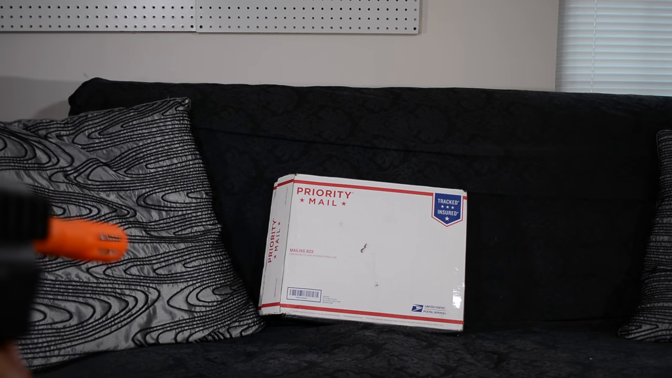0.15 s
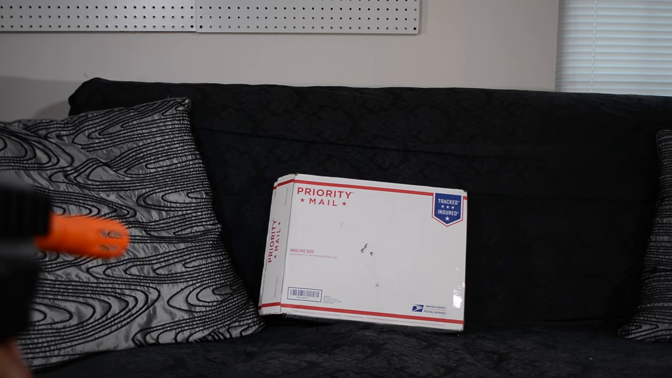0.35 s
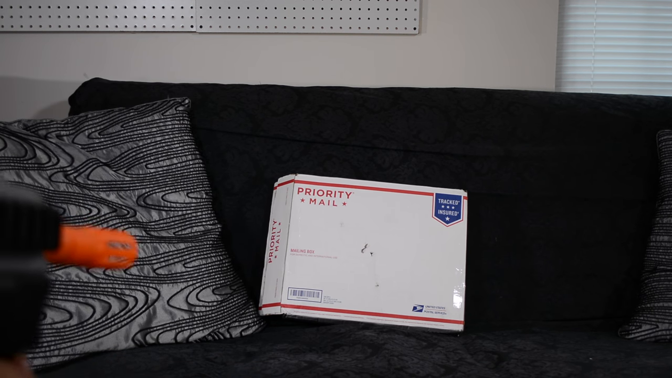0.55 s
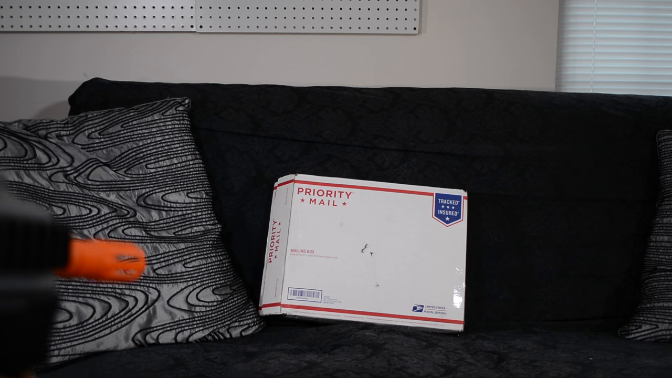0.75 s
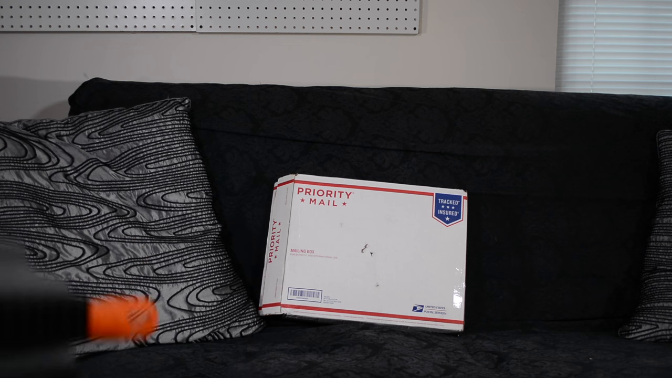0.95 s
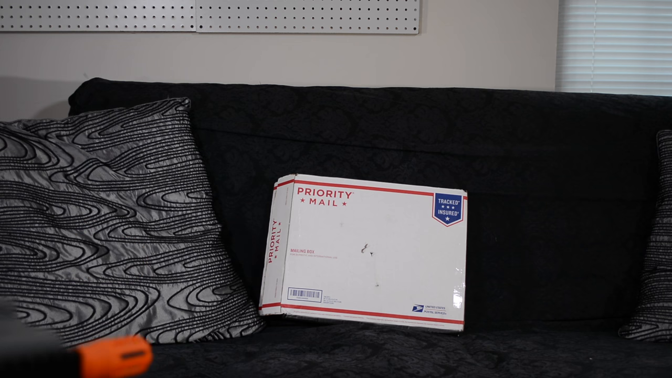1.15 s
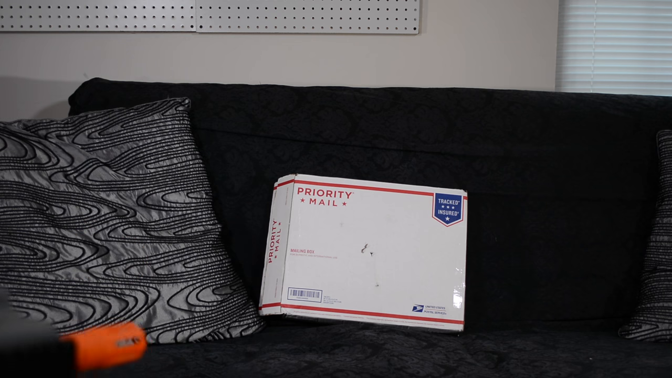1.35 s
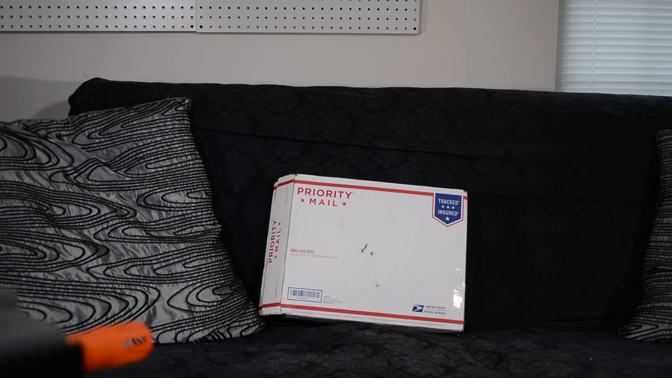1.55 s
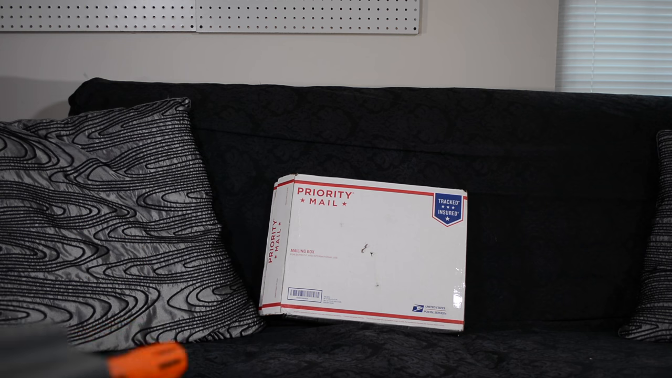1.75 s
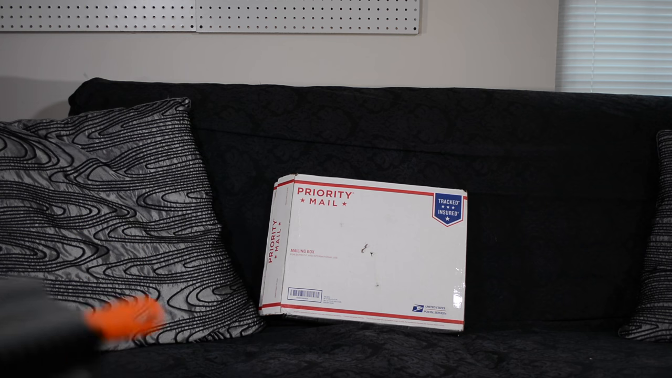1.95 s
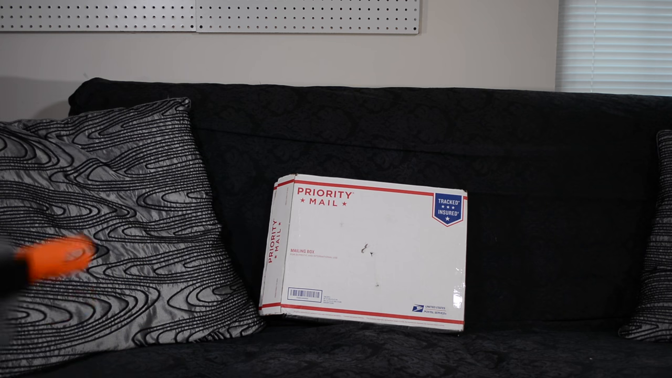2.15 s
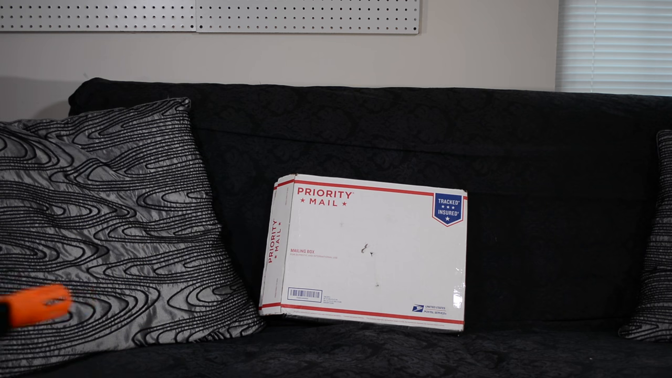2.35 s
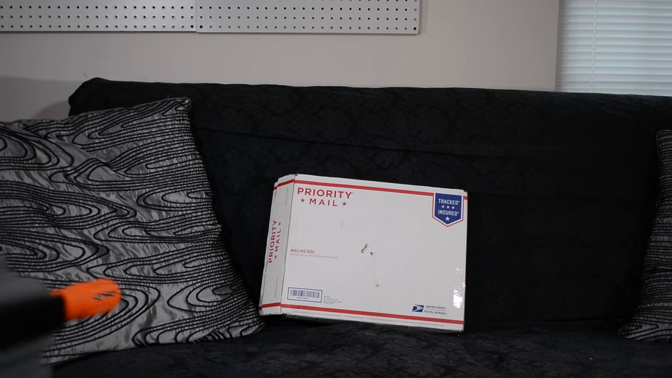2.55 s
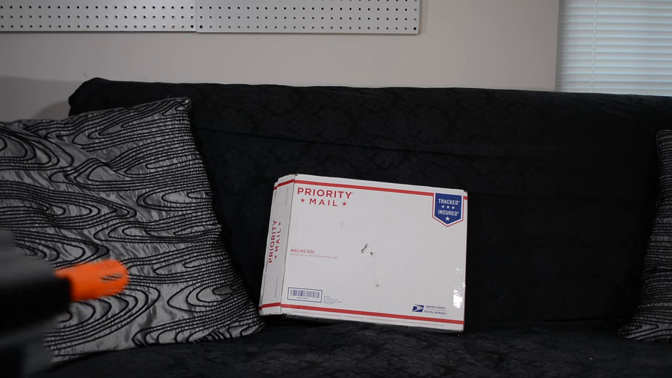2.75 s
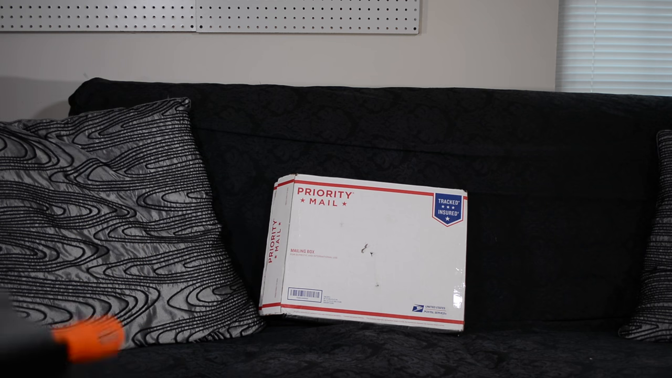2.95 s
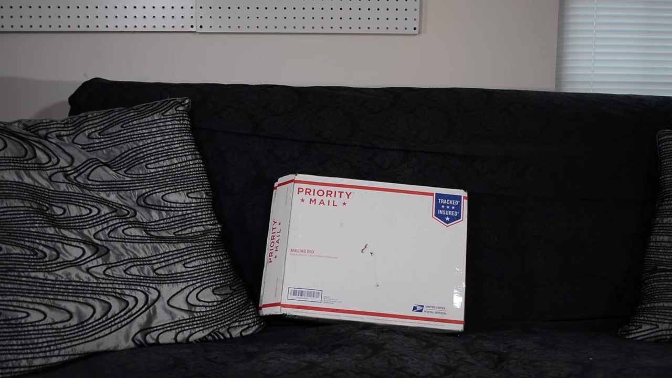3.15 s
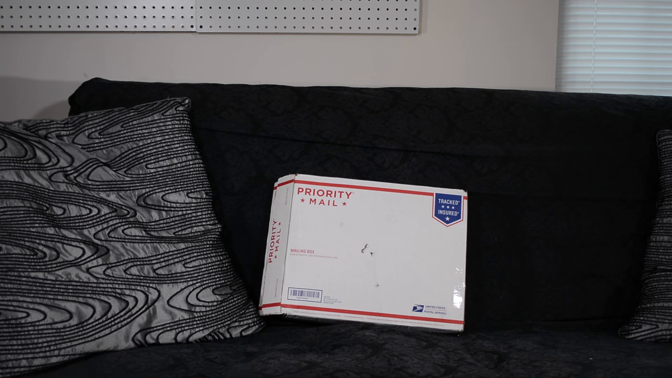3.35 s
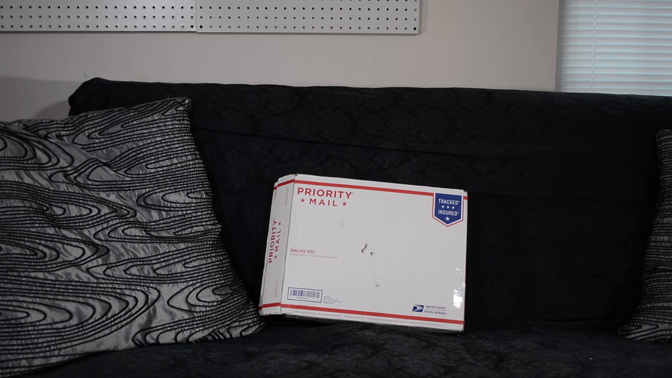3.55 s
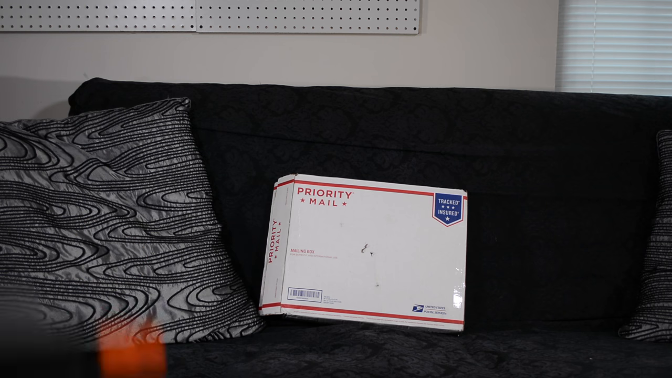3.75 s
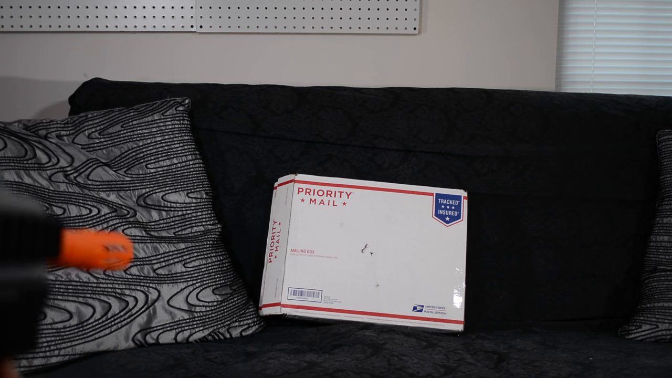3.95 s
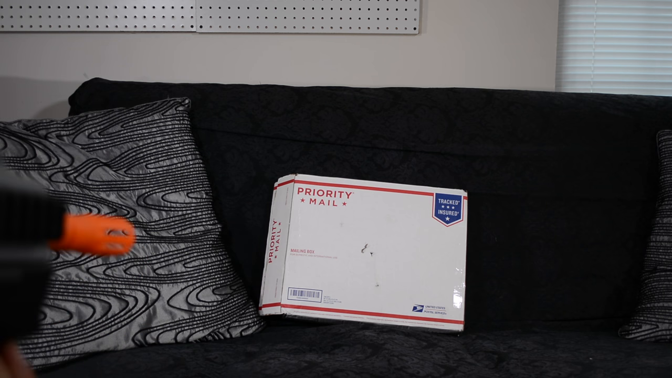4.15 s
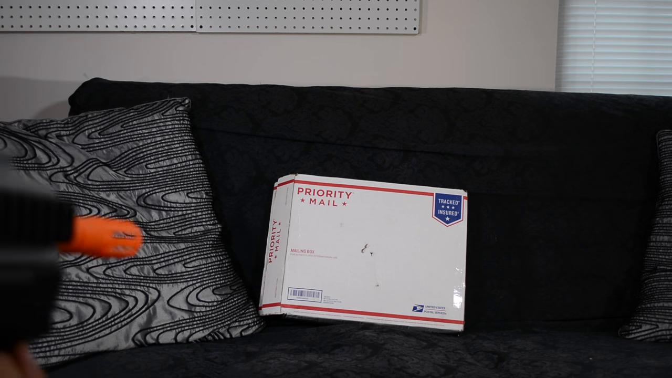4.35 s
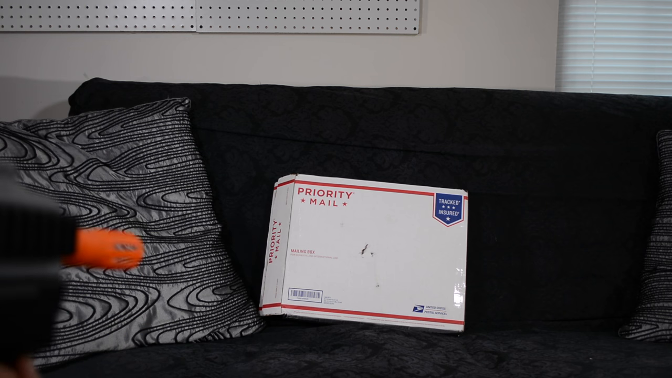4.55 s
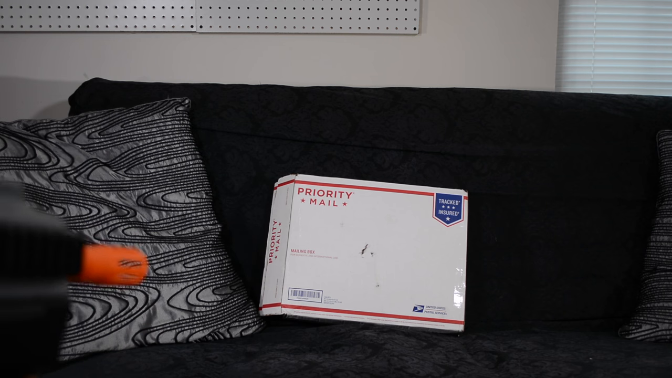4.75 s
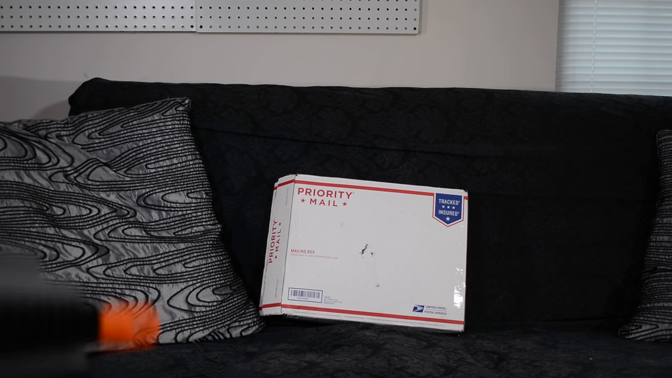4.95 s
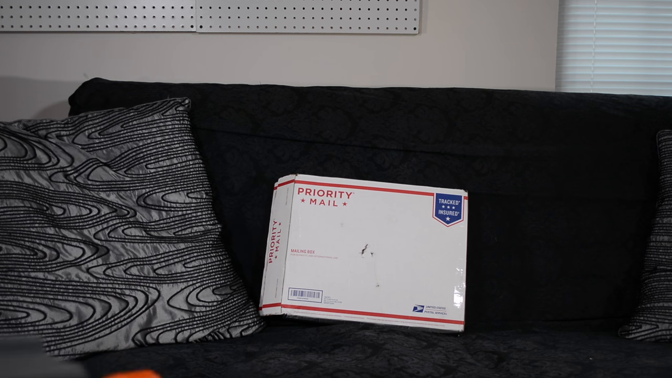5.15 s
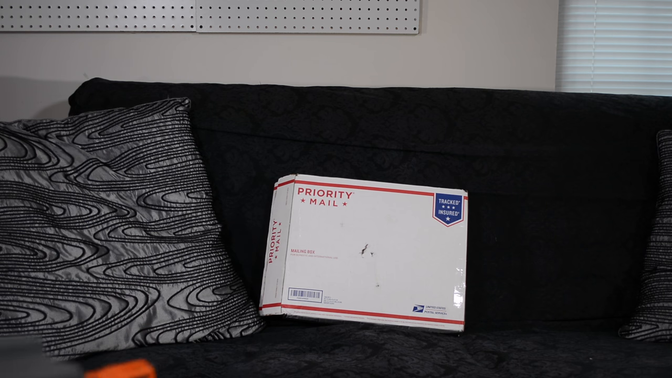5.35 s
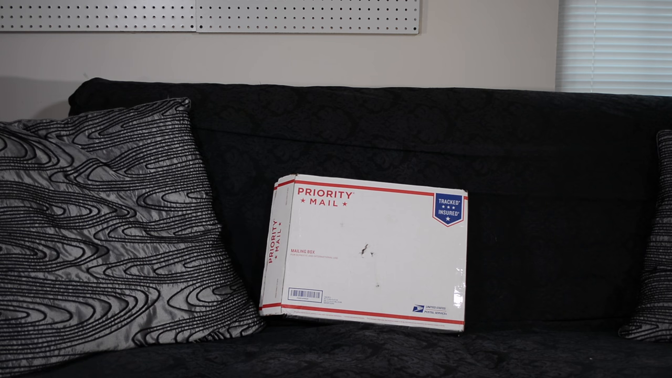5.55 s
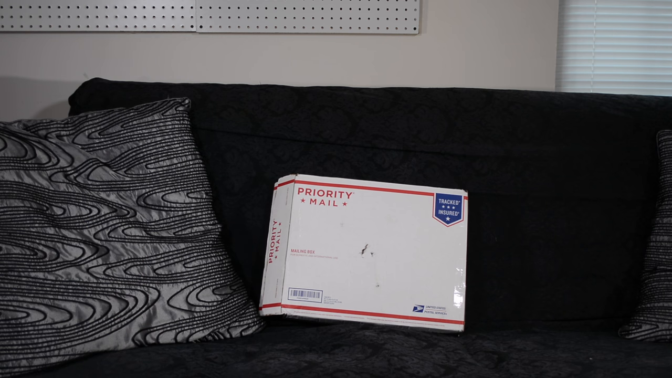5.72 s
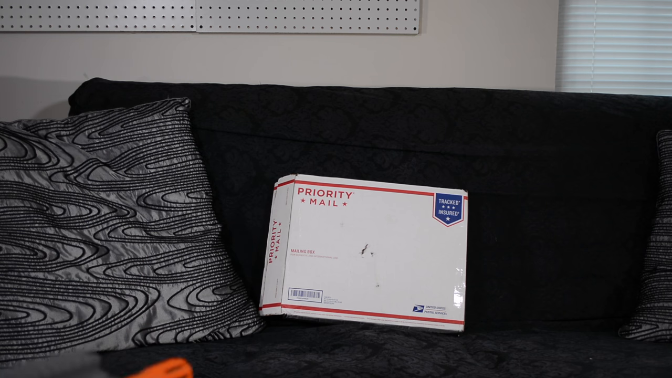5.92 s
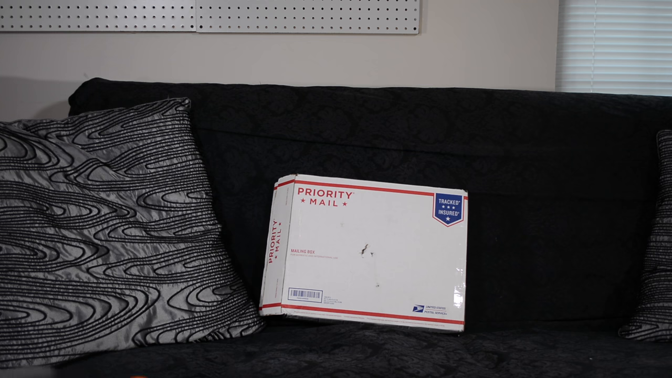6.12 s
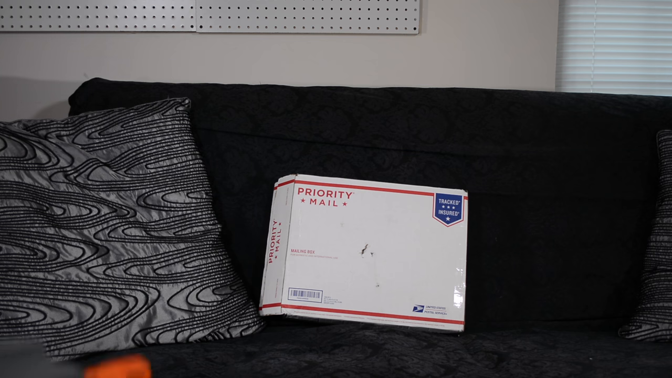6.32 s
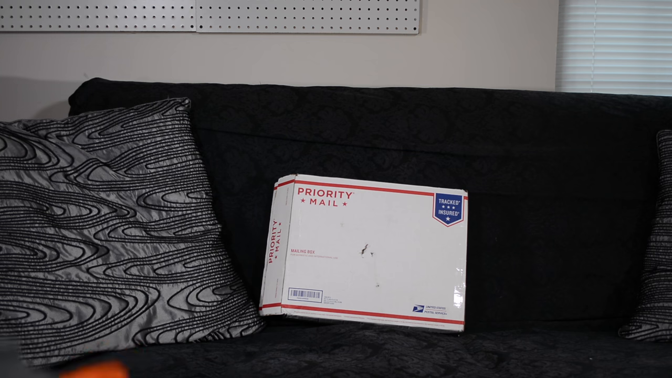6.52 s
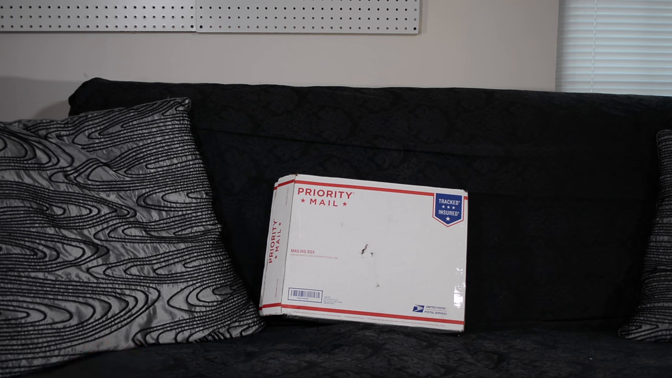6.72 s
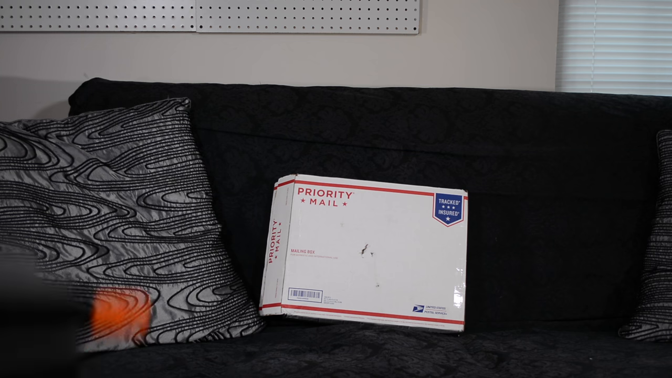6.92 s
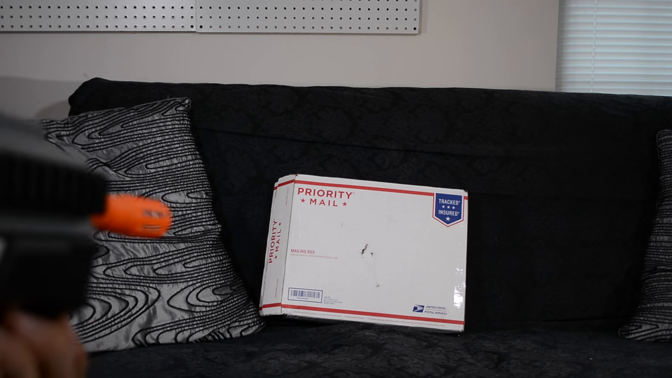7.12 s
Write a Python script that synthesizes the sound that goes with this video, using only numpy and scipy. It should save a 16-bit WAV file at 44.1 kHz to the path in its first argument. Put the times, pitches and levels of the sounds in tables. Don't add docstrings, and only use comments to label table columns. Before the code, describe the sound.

In a small room, a toy dart blaster cracks and thumps a box twice, its spring humming, then its bolt slides, clatters and slams back.

```python
import sys
import numpy as np
from scipy import signal
from scipy.fft import rfft, irfft, next_fast_len
from scipy.io import wavfile
from scipy.ndimage import uniform_filter1d, map_coordinates

SR = 44100
rng = np.random.default_rng(int(sys.argv[2]) if len(sys.argv) > 2 else 0)


def generate_wav(signal):
    frames = np.transpose(np.atleast_2d(signal))
    scaled = np.clip(frames, -1, 1) * 32767
    pcm = np.round(scaled).astype(np.int16)
    wavfile.write(sys.argv[1], SR, pcm)


def convert_level_to_amplitude(level_db):
    exponent = np.asarray(level_db, float) / 20
    return 10 ** exponent


N = 316638


def unit(x):
    return x / np.sqrt(np.mean(x ** 2) + 1e-20)


def along(points, hz):
    f, v = np.transpose(points)
    return np.interp(np.log(hz + 1), np.log(f + 1), v)


def peak(f, hz, width_hz):
    return 1j * f * width_hz / (hz * hz - f * f + 1j * f * width_hz + 1e-9)


def resonances(table):
    return lambda f: sum((-1) ** k * convert_level_to_amplitude(db) * peak(f, hz, width_hz) for k, (hz, width_hz, db) in enumerate(table))


def filtered(x, response):
    m = next_fast_len(x.shape[-1] + 2048)
    return irfft(rfft(x, m) * response(np.fft.rfftfreq(m, 1 / SR)), m)[..., :x.shape[-1]]


def ringing(start_s, freqs_hz, modes, waver_db, wavers_per_s=30):
    span_s = min(1.6, max(t60 for db, t60 in modes))
    t = np.arange(round(span_s * SR)) / SR
    hum = np.zeros(len(t))
    for hz, (db, t60) in zip(freqs_hz, modes):
        waver = convert_level_to_amplitude(waver_db * map_coordinates(rng.standard_normal(60), [t * wavers_per_s], mode="wrap"))
        hum += convert_level_to_amplitude(db - 60 * t / t60) * waver * np.sin(2 * np.pi * hz * t)
    fade_out = np.clip((t[-1] - t) / t[-1] * 4, 0, 1)
    return np.pad(hum * fade_out, (round(start_s * SR), N))[:N]


# (frequency [Hz], t60 [s])
ROOM_T60 = [(100, 0.26), (400, 0.36), (1500, 0.29), (5000, 0.36), (9000, 0.33), (15000, 0.17)]
# (frequency [Hz], t60 [s])
NEXT_ROOMS_T60 = [(100, .6), (400, .6), (900, 1.1), (1600, .9), (2800, .4), (9000, .25)]


def tails(count, span_s, late_db):
    hz, t, z = signal.stft(rng.standard_normal((count, round(span_s * SR))), SR, nperseg=256)
    fall = convert_level_to_amplitude(-60 * t / along(ROOM_T60, hz)[:, None])
    fall = fall + convert_level_to_amplitude(late_db - 60 * t / along(NEXT_ROOMS_T60, hz)[:, None])
    streaks = convert_level_to_amplitude(3 * rng.standard_normal((count, len(hz), 1)))
    tail = signal.istft(z * fall * streaks, SR, nperseg=256)[1]
    tail = tail * np.clip(np.arange(tail.shape[1]) / SR / 0.0074, 0, 1)
    return tail / np.linalg.norm(tail, axis=1, keepdims=True)


def with_room(x, room_db, late_db):
    return x + convert_level_to_amplitude(room_db) * signal.fftconvolve(x, tails(1, .4, late_db)[0])[:N]


def rows(table, thud_db, ring_db, length_s):
    return [(s, db, thud_db, snap_db, hz, ring_db, length_s) for s, db, hz, snap_db in table]


def contacts(table, room, boost_db, jolt_db, lag_s, snap_hz):
    s, db, thud_db, snap_db, ring_hz, ring_db, length_s = np.transpose(table)[:, :, None]
    count = len(table)
    t = np.arange(2560) / SR
    length_s = np.clip(length_s, .0005, .05)
    noise = rng.standard_normal((count, len(t))) * (1 - np.exp(-t / 0.00028))
    noise[:, 16] += 4
    other_hz = ring_hz * convert_level_to_amplitude(rng.uniform(-6, 6, (count, 3)).T[:, :, None])
    dull_hz = np.clip(9000 * convert_level_to_amplitude(snap_db + 20.0), 1200, 40000)

    def snap(f):
        return -convert_level_to_amplitude(snap_db + 14.5) * peak(f, snap_hz, 1.3 * snap_hz) ** 2

    def body(f, part_db):
        walls = peak(f, 2300, 4800) ** 2 / (1 + 1j * f / dull_hz) ** 2
        thud = convert_level_to_amplitude(thud_db + 21) * peak(f, 350, 540) ** 2
        others = sum(peak(f, hz, 0.047 * hz) for hz in other_hz)
        part = convert_level_to_amplitude(part_db) * (peak(f, ring_hz, 0.11 * ring_hz) + convert_level_to_amplitude(-10) * others)
        jolt = convert_level_to_amplitude(thud_db + 18.5 + jolt_db) * peak(f, 55, 50) ** 2
        return walls - thud + part + jolt

    snap_share = 0.49
    knock = filtered(noise * np.exp(-t / length_s), lambda f: body(f, ring_db))
    knock = knock + filtered(noise * np.exp(-t / length_s / snap_share) / np.sqrt(snap_share), snap)
    impulse = np.tile(t == 0, (count, 1)) * 1.
    tick = filtered(impulse, lambda f: body(f, ring_db - 7.5) + snap(f))
    size = convert_level_to_amplitude(db + boost_db) / np.abs(knock).max(axis=1, keepdims=True)
    echo = signal.fftconvolve(tick * size * np.sqrt(length_s * SR / 2), room, axes=1)
    out = np.zeros(N + SR)
    for start, direct, wet in zip(np.round((s[:, 0] + lag_s) * SR).astype(int), knock * size, echo):
        out[start:start + len(direct)] += direct
        out[start:start + len(wet)] += wet
    return out[:N]


# (frequency [Hz], density [dB/Hz])
AIR_SPECTRUM = [(15, -35.5), (25, -11.5), (142, -5.5), (187, -7.5), (266, -7), (339, -12.5), (378, -9.5),
                (445, -18.5), (483, -15.5), (1880, -25.5), (2460, -21.5), (3910, -29.5), (10700, -36),
                (15200, -40), (16500, -45)]
# (frequency [Hz], level [dB])
WHINE_LINES = [(263.8, -83), (2309, -85), (2428, -77.5), (2546, -82)]


def floor():
    t = np.arange(N) / SR
    out = convert_level_to_amplitude(-63.5) * unit(filtered(rng.standard_normal(N), lambda f: convert_level_to_amplitude(along(AIR_SPECTRUM, f))))
    for hz, db in WHINE_LINES:
        drift = 0.03 * np.cumsum(rng.standard_normal(N)) / np.sqrt(100)
        out += convert_level_to_amplitude(db) * np.sin(2 * np.pi * hz * t + drift)
    return out


# (time [s], peak [dB], ring [Hz], snap [dB])
CREAK_EVENTS = [(1.425, -45.5, 896, -15), (1.497, -44, 754, -29.5), (1.626, -46, 1385, -28),
                (2.402, -44, 710, -34), (2.55, -40, 1340, -31), (2.857, -35, 1410, -22),
                (3.127, -40, 1190, -23), (3.148, -42.5, 640, -29), (3.247, -47, 764, -27),
                (3.29, -50, 7000, 0.5), (3.31, -53, 6000, 0), (3.6, -54, 5470, -1), (3.738, -53, 6400, -1),
                (3.462, -48.5, 1218, -19), (3.499, -48, 1580, -4), (3.702, -49.5, 1220, -24),
                (3.948, -48.5, 1332, -22), (4.066, -53.5, 1410, -31), (5.126, -39.5, 1110, -25.5),
                (5.156, -37, 6000, -6), (5.285, -41.5, 790, -43), (5.481, -45.5, 1190, -35),
                (6.097, -46.5, 991, -33), (6.227, -38.5, 1000, -28), (6.242, -42, 7000, -5),
                (6.814, -46, 704, -36.5), (6.965, -49, 5010, -3), (7.125, -47, 786, -28)]


def creaks():
    return rows(CREAK_EVENTS, thud_db=-14, ring_db=8.2, length_s=0.0071)


# (time [s], peak [dB], ring [Hz], snap [dB])
TAP_EVENTS = [(.963, -28.5, 4800, -17.5), (1.0305, -24.5, 4756, -10), (4.9435, -26, 4820, -14),
              (6.3005, -33.5, 4800, -19), (7.038, -29, 3970, -12.5), (3.8215, -29, 5650, -6.5),
              (3.839, -46, 4200, -16), (3.96, -48, 8000, 0), (.8252, -56, 5300, -4), (.8442, -51, 7500, 2),
              (.862, -55, 7500, 2), (.9021, -56, 4000, -4), (4.835, -35, 4700, -12),
              (5.755, -27.5, 3900, -7.5), (1.971, -30.5, 5500, -5), (5.2275, -24.5, 5080, -13)]


def dart_taps():
    return rows(TAP_EVENTS, thud_db=-22.5, ring_db=11.5, length_s=0.0053)


# (time [s], frequency [Hz], level [dB], t60 [s])
RATTLE_MODES = [(3.822, 3320, -60, .12), (3.822, 4120, -50, .1), (3.824, 4420, -53, .12),
                (3.821, 5696, -43, .04), (3.835, 5696, -58, .22), (3.838, 4200, -54, .05),
                (3.866, 4200, -57, .05), (3.822, 6740, -54, .06), (3.19, 3080, -72, .6),
                (3.35, 700, -65, .12), (.9645, 2260, -46, .035), (4.822, 782, -43, .14),
                (4.945, 5120, -56, .15), (4.945, 2200, -44, .035)]


def rattles():
    return sum(ringing(s, [hz], [(db, t60)], waver_db=6.5) for s, hz, db, t60 in RATTLE_MODES)


# (full force [s], hold [s], rubbing [dB], speed [dB],
# release [s])
STROKE_EVENTS = [(0.454, 0.049, -37, -1, .12), (4.601, 0.039, -30.5, -7, 0.11),
                 (1.753, 0.022, -35, -4.5, 0.071), (1.804, 0.066, -53, 0.5, .05),
                 (1.889, 0.065, -42, 3, 0.19), (2.084, .003, -35, 2, 0.12), (2.25, 0.035, -37, -4.5, 0.1),
                 (2.435, 0.16, -62, -3, 0.14), (2.658, 0.081, -49.5, -6, .05),
                 (2.765, 0.0054, -40, -9.5, 0.015), (2.81, 0.062, -57.5, -3, .05),
                 (2.882, 0.038, -44.5, -2, 0.21), (3.146, 0.0038, -54.5, -10.5, 0.073),
                 (3.202, 0.17, -65.5, -5.5, 0.1), (3.5, .01, -68.5, 0.5, 0.097),
                 (3.592, .02, -68.5, -4.5, 0.16), (3.725, 0.13, -71, -0.5, 0.047),
                 (5.52, 0.02, -39.5, -5.5, 0.25), (5.628, 0.1, -43.5, 3, 0.2),
                 (5.834, 0.0024, -28, -0.5, 0.064), (5.857, 0.0085, -52, 7, 0.067),
                 (5.966, 0.0092, -55.5, -8.5, 0.11), (6.026, 0.0066, -43, -6.5, 0.081),
                 (6.44, 0.1, -46.5, -1.5, .05), (6.568, .004, -37, -7, 0.065),
                 (6.625, 0.086, -58, -3, 0.061), (6.829, 0.34, -75.5, 1, 0.096)]
# (frequency [Hz], width [Hz], level [dB])
SHELL_MODES = [(435, 250, -10), (716, 99, 0), (1410, 600, -4)]
# (frequency [Hz], width [Hz], level [dB])
RAIL_MODES = [(2300, 250, 1), (3450, 480, 2.5), (5400, 2280, 1.5), (6680, 1900, 1.5)]
# (frequency [Hz], width [Hz], level [dB])
CHATTER_MODES = [(1320, 320, 0), (3000, 1200, -8.5), (5060, 1500, -4.5)]


def strokes():
    attack_s, fade_db = 0.035, 32
    hiss_lag_s = 0.017
    slips_per_s = 900
    time_s = np.arange(N) / SR
    t = np.arange(0, N, 32) / SR
    s, hold_s, db, speed_db, release_s = np.transpose(STROKE_EVENTS)[:, :, None]
    rise = np.clip(s - t, 0, None) / attack_s
    fall = np.clip(t - s - hold_s, 0, None) / np.clip(release_s, .005, 1)
    force_db = db - fade_db * (rise + fall)

    def catch():
        return unit(uniform_filter1d(rng.standard_normal(N), 300))

    shared = catch()
    out = np.zeros(N)
    layers = [(0, resonances(SHELL_MODES), 0),
              (speed_db - 0.5, resonances(RAIL_MODES), 0),
              (2.3 * speed_db - 9, lambda f: peak(f, 9500, 5900) ** 2, hiss_lag_s)]
    for lift_db, shape, lag_s in layers:
        bursts_db = 2.4 * np.minimum(rng.exponential(size=N), 5)
        grains = rng.standard_normal(N) * convert_level_to_amplitude(0.73 * shared + 1.1 * catch() + bursts_db)
        level = convert_level_to_amplitude(force_db + lift_db).max(axis=0)
        out += unit(filtered(grains, shape)) * np.interp(time_s - lag_s, t, level)
    slips = (rng.uniform(size=N) < slips_per_s / SR) * rng.standard_normal(N) * convert_level_to_amplitude(3.5 * catch())
    level = convert_level_to_amplitude(force_db - 5 - 0.98 * np.clip(speed_db + 4, -1, 20)).max(axis=0)
    out += unit(filtered(slips, resonances(CHATTER_MODES))) * np.interp(time_s, t, level)
    return with_room(out, room_db=-9, late_db=-20.5)


# (time [s], peak [dB], frequency [Hz], t60 [s])
THUMP_EVENTS = [(1.649, -36, 330, 0.057), (1.733, -33, 300, 0.067), (2.07, -36, 300, .03),
                (2.249, -39, 400, 0.07), (5.363, -40, 400, 0.04), (5.819, -34, 75, .06),
                (5.502, -34, 290, 0.05), (6.023, -43, 460, 0.066), (2.8775, -28, 330, 0.04),
                (2.935, -22, 350, 0.035), (2.9455, -23, 330, 0.055), (6.56, -21.5, 290, 0.035),
                (6.567, -22, 300, 0.045)]


def thumps():
    push_s, push_db = .00018, 3
    blows, hits = np.zeros(N), np.zeros(N)
    for s, db, hz, t60 in THUMP_EVENTS:
        modes = [(db - 6.5, t60), (db - 11, 1.8 * t60)]
        blows += ringing(s - 1 / (4 * hz), [hz, 1.35 * hz], modes, waver_db=1.0)
        hits[round(s * SR)] = convert_level_to_amplitude(db + push_db)
    push = np.exp(-(np.arange(-64, 65) / SR / push_s) ** 2)
    out = filtered(blows + np.convolve(hits, push, "same"), lambda f: (1j * f / (60 + 1j * f)) ** 2)
    return with_room(out, room_db=-13.0, late_db=-33.0)


# (time [s], peak [dB], ring [Hz], snap [dB])
KNOCK_EVENTS = [(.537, -16.5, 767, -7.5), (2.184, -27, 716, -26.5), (2.703, -37, 1010, -22),
                (2.768, -35, 700, -28), (2.875, -32, 990, -40), (2.944, -29, 1450, -30),
                (4.832, -38, 780, -32), (1.882, -34.5, 620, -32), (3.811, -49, 620, -28),
                (6.033, -33, 800, -29), (6.588, -31.5, 700, -32), (5.307, -42.5, 790, -20.5),
                (5.501, -38.5, 720, -10), (5.65, -20.5, 810, -19.5), (5.813, -22.5, 614, -13.5),
                (5.966, -35, 754, -24), (6.016, -31.5, 1100, -20.5), (6.049, -32.5, 795, -31),
                (6.148, -35.5, 765, -28), (6.507, -30, 660, -40)]


def knocks():
    return rows(KNOCK_EVENTS, thud_db=-21.5, ring_db=6.2, length_s=0.005)


# (time [s], peak [dB], ring [Hz], snap [dB])
TICK_EVENTS = [(1.959, -32, 6450, -8.5), (.536, -12, 6100, 7), (1.744, -23, 4770, -24),
               (1.8945, -24.5, 5800, -5), (1.979, -31, 3300, -10), (2.45, -46, 5000, -5),
               (5.325, -42, 4820, -13), (5.534, -31, 4056, -16), (5.731, -26, 4000, -8),
               (5.985, -44, 6500, 2), (6.023, -24, 3980, -7), (6.537, -21, 7500, 4), (6.581, -28, 3500, -8),
               (2.191, -27.5, 2860, -26), (2.655, -15.5, 3800, -2), (3.822, -31, 4150, -8.5),
               (2.565, -50, 9030, 3), (6.004, -46, 9030, 2), (6.078, -48, 9000, 4),
               (4.804, -21, 3650, -3.5), (5.22, -21, 4770, -6.5), (5.344, -25.5, 4000, -4),
               (5.739, -14, 3200, -8), (6.411, -17.5, 6500, -3), (6.55, -18.5, 4730, -7),
               (6.627, -26, 2790, -10)]


def ticks():
    return rows(TICK_EVENTS, thud_db=-19, ring_db=14, length_s=0.0051)


# (time [s], peak [dB], ring [Hz], snap [dB])
CLICK_EVENTS = [(1.648, -17.5, 1490, -14.5), (1.719, -36, 1420, -16), (1.7365, -23, 1900, -14.5),
                (1.755, -24.5, 1200, -18.5), (1.779, -27.5, 1350, -19.5), (1.871, -32.5, 1390, -22.5),
                (2.016, -35, 1300, -21.5), (3.817, -38, 2310, -6), (4.827, -34.5, 1396, -19.5),
                (5.358, -37, 1300, -35), (5.533, -30.5, 1170, -24), (5.635, -31, 1460, -17.5),
                (6.028, -28.5, 2500, -10), (1.888, -32, 1450, -24), (2.24, -36.5, 2480, -19),
                (2.248, -16.5, 2440, -10.5), (2.463, -25, 1370, -10.5), (2.604, -20, 1500, -16),
                (2.7468, -17.5, 1340, -9.5), (2.933, -24, 1570, -34), (2.967, -27, 1690, -18),
                (2.991, -30.5, 2700, -16), (3.004, -34.5, 1300, -18), (5.56, -31.5, 1650, -28),
                (1.038, -38, 1090, -30), (5.369, -19.5, 1329, -13), (5.514, -26.5, 1320, -23.5),
                (6.172, -26, 1530, -12.5), (6.387, -19, 1515, -15), (6.457, -27.5, 1410, -23),
                (6.478, -24, 2280, -8), (6.558, -24.5, 1450, -30), (6.566, -27.5, 1340, -34),
                (6.674, -31, 2280, -7), (6.691, -40.5, 1190, -25)]


def clacks():
    return rows(CLICK_EVENTS, thud_db=-15, ring_db=9.2, length_s=0.0059)


# (time [s], peak [dB], ring [Hz], snap [dB], length [s])
STOP_EVENTS = [(2.0703, -20.5, 2500, -18, 0.0039), (2.0725, -9, 4950, -14, 0.0042),
               (2.0757, 6.5, 5550, 9, 0.0034), (2.0784, 6.5, 3450, -3.5, 0.0019),
               (2.083, -13.5, 1220, -19, 0.0057), (2.0925, -12, 5500, 0, 0.0041),
               (5.8165, -15, 2500, -16, 0.0027), (5.8197, 7, 6490, -1, 0.0032),
               (5.822, 5, 3800, -2, 0.0027), (5.828, -9, 1020, -13.5, 0.0049), (5.837, -10, 6000, 0, .005)]


def bolt_stops():
    return [(s, db, -22, snap_db, hz, 4.8, length_s) for s, db, hz, snap_db, length_s in STOP_EVENTS]


# (time [s], ring [dB])
SLAM_EVENTS = [
    (2.077, -29),
    (5.821, -27.5),
]
# (frequency [Hz], level [dB], t60 [s])
BOLT_MODES = [
    [(2003, -6.5, .25), (3500, 2, 0.21), (4307, 4, .1), (4700, -1, 0.18), (5152, -5.5, .18),
     (5730, -0.5, .15), (5900, -9.5, .2), (6400, 1.5, 0.14), (7530, -14, .15), (9560, -8.5, .16),
     (11470, -14.5, .15), (12500, -19, .15)],
    [(3360, -1, 0.22), (3770, -5, .2), (4000, -7, .2), (4280, -4.5, .15), (4760, -13, .25), (5700, -2, .17),
     (6750, -2, .25), (6640, -8, .25), (9050, -16, .3), (9512, -11, .16), (10000, -10, .2),
     (11340, -13, .18)],
]


def bolt_ring():
    out = np.zeros(N)
    for (s, db), modes in zip(SLAM_EVENTS, BOLT_MODES):
        hz = [m[0] for m in modes]
        out += convert_level_to_amplitude(db) * ringing(s, hz, [m[1:] for m in modes], waver_db=7, wavers_per_s=110)
    return out


# (time [s], level [dB], t60 [s])
GUIDE_EVENTS = [
    (.537, -34.5, .8),
    (4.645, -35, 1.3),
]


def guide():
    t = np.arange(N) / SR
    held_s, held_db, grip_s = [.7, 4.795], [-6, -22], .008
    out = np.zeros(N)
    for (s, db, t60), touch_s, drop_db in zip(GUIDE_EVENTS, held_s, held_db):
        pair = ringing(s, [772, 792], [(db, t60), (db - 11, t60)], waver_db=3.0)
        out += pair * convert_level_to_amplitude(drop_db * np.clip((t - touch_s) / grip_s, 0, 1))
    return out


# (plunger stops [s], dart lands [s])
LANDINGS = [
    (.391, .4055),
    (4.53, 4.5455),
]
SPRING_MODES_HZ = [102, 203, 296, 689, 713, 772, 873, 910, 1380, 651, 1034, 1114, 1233, 1314, 1518, 1615]
# (level [dB], t60 [s])
SPRING_MODES = [
    [(-53, 2.4), (-45, 1.7), (-42, .55), (-49, 1.6), (-50, 1.8), (-30, .4), (-46, 1.9), (-50, 5),
     (-57, 1.6), (-52, 1.8), (-46, .7), (-56, 1), (-54, 1.5), (-55, 1.1), (-58, .9), (-60, 1.5)],
    [(-47, 1.7), (-50, .9), (-36, .8), (-58, 1.2), (-50, 1.6), (-30, .3), (-56, 1.5), (-51, 2.2), (-52, .6),
     (-55, 1.3), (-50, .7), (-54, .7), (-57, 1), (-58, .8), (-56, .6), (-60, .8)],
]


def spring():
    return sum(ringing(stop_s, SPRING_MODES_HZ, modes, waver_db=1.9)
               for (stop_s, land_s), modes in zip(LANDINGS, SPRING_MODES))


BOX_MODES_HZ = [205, 328, 390, 455, 528, 640, 712, 830]
# (level [dB], t60 [s])
BOX_MODES = [
    [(-17.5, 0.24), (-21.5, 0.36), (-23.5, 0.36), (-20.5, 0.25), (-14, .2), (-21, 0.35), (-26, 0.38),
     (-26, 0.19)],
    [(-13.5, 0.2), (-24.5, 0.17), (-26, 0.13), (-19.5, 0.28), (-17.5, 0.27), (-24, 0.21), (-25, 0.24),
     (-34.5, 0.12)],
]


def barrel_and_box():
    out = np.zeros(N)
    for (stop_s, land_s), modes in zip(LANDINGS, BOX_MODES):
        out += ringing(stop_s, BOX_MODES_HZ[:1], modes[:1], waver_db=2.0)
        out += ringing(land_s, BOX_MODES_HZ[1:], modes[1:], waver_db=3.5)
    return out


TUBE_HZ = [1330, 2180, 2570, 2830, 3310, 3710, 4540, 5280, 6250, 7080]
# (time [s], pace of the stages [ratio], strength [dB])
TRIGGER_PULLS = [
    (.374, 1.0, 0),
    (4.515, .93, 0.5),
]


def coil_clashes(count=70):
    first_db, series_t60_s, clash_t60_s, span_s = -11, .42, .016, .3
    t, out = np.arange(800) / SR, np.zeros(N + SR)
    for s, pace, gain_db in TRIGGER_PULLS:
        when, mode, size, detune = rng.uniform(size=(count, 4)).T[:, :, None]
        delay_s = .012 + span_s * when ** 1.5
        hz = np.array(TUBE_HZ)[(mode * len(TUBE_HZ)).astype(int)] * (1 + .06 * (detune - .5))
        db = first_db + gain_db - 14 * size - 60 * delay_s / series_t60_s - 60 * t / clash_t60_s
        ring = convert_level_to_amplitude(db) * np.sin(2 * np.pi * hz * t)
        at = np.round((s + delay_s) * SR).astype(int) + np.arange(len(t))
        out += np.bincount(at.ravel(), ring.ravel(), len(out))
    return out[:N]


# (time [s], peak [dB], ring [Hz], snap [dB])
ROCK_EVENTS = [(.412, -6.5, 1970, -10), (.424, -3.5, 558, 0), (.432, -5.5, 520, -4.5),
               (.439, -11.5, 659, 8.5), (4.58, -10.5, 521, -3), (4.556, 0.5, 1700, -6),
               (4.572, -5, 560, 8.5)]


def box_rocks():
    return rows(ROCK_EVENTS, thud_db=-6, ring_db=3.1, length_s=0.0072)


# (time [s], peak [dB], ring [Hz], snap [dB])
SKID_EVENTS = [(.3835, -1.5, 2100, -12.5), (.3858, -3, 4200, -8), (.3975, -5, 4400, -8),
               (4.526, -0.5, 2006, -8.5), (4.549, -4, 4800, -8), (4.59, -10.5, 4970, -8.5)]


def plunger_skids():
    return rows(SKID_EVENTS, thud_db=-19.5, ring_db=6.6, length_s=0.0033)


# (delay [s], peak [dB], thud [dB], snap [dB], length [s])
SHOT_STAGES = [
    (0, 9, -14, 2.5, 0.0031),
    (.0065, 1, -21.5, -14.5, .003),
    (0.0176, -5, -7, -12, .006),
    (0.034, -0.5, -2.5, -6, 0.01),
]
SHOT_STAGES_HZ = [5200, 1300, 4330, 500]


def shots():
    return [(s + pace * delay_s, db + gain_db, thud_db, snap_db, hz, 2, length_s)
            for s, pace, gain_db in TRIGGER_PULLS
            for (delay_s, db, thud_db, snap_db, length_s), hz in zip(SHOT_STAGES, SHOT_STAGES_HZ)]


# (frequency [Hz], gain [dB])
MIC_RESPONSE = [(20, -27.5), (40, -9.5), (150, -5), (1000, 7), (3000, 3), (5200, 2.5), (8000, -9),
                (16000, -17.5)]


def scene():
    fire = shots() + box_rocks() + plunger_skids()
    metal = bolt_stops()
    small = ticks() + dart_taps() + clacks() + knocks() + creaks()
    fire_room = convert_level_to_amplitude(-5.5) * tails(len(fire), span_s=.75, late_db=-21)
    metal_room = convert_level_to_amplitude(-10) * tails(len(metal), span_s=.4, late_db=-35.5)
    small_room = convert_level_to_amplitude(-7.5) * tails(len(small), span_s=.26, late_db=-36.5)
    hits = contacts(fire, fire_room, boost_db=2.0, jolt_db=-15, lag_s=0, snap_hz=7000)
    hits += contacts(metal, metal_room, boost_db=0.5, jolt_db=-12.0, lag_s=0, snap_hz=9740)
    hits += contacts(small, small_room, boost_db=0.5, jolt_db=-15.5, lag_s=.001, snap_hz=7000)
    handling = strokes() + thumps() + rattles() + bolt_ring()
    after_shot = guide() + spring() + barrel_and_box() + coil_clashes()
    return (floor() + handling + after_shot + filtered(hits, lambda f: convert_level_to_amplitude(along(MIC_RESPONSE, f))))[None]


def roll_off(x):
    return signal.sosfilt(signal.butter(12, 16970, fs=SR, output="sos"), x)


# (frequency [Hz], gain [dB])
BAND_LIMIT = [(15850, 0), (16050, -30), (16800, -32), (17000, -90)]


def record(dry):
    limited = dry / (1 + np.abs(dry / 0.48) ** 12) ** (1 / 12)
    mix = filtered(limited, lambda f: convert_level_to_amplitude(along(BAND_LIMIT, f)))
    return roll_off(mix)


dry = scene()
out = record(dry)
generate_wav(out)
```